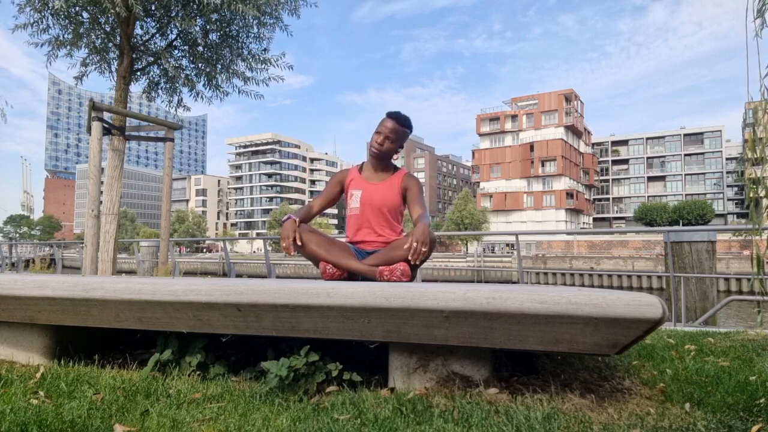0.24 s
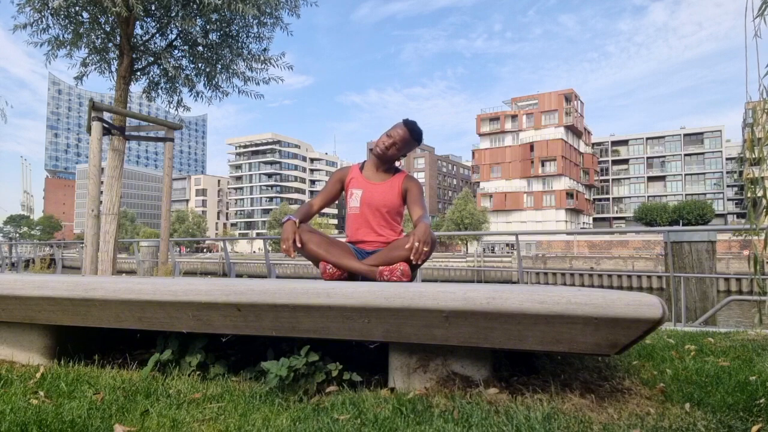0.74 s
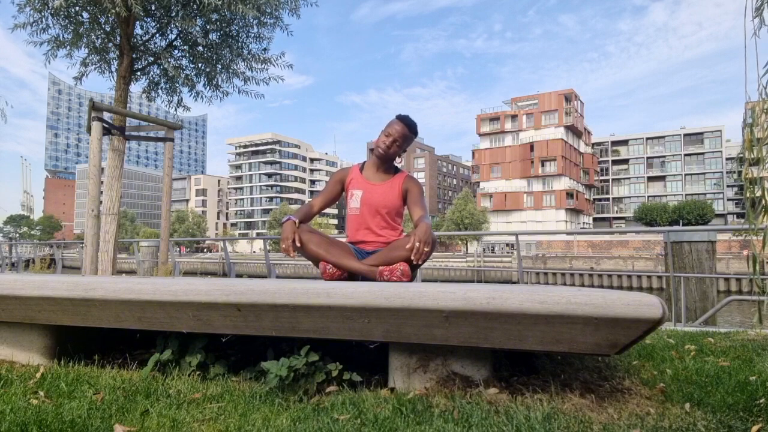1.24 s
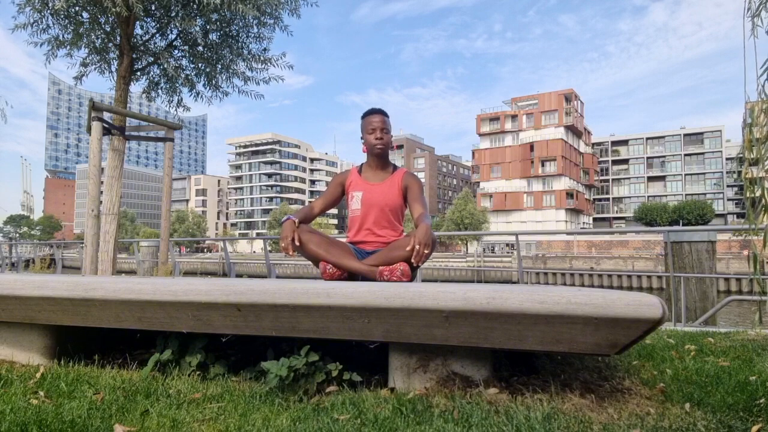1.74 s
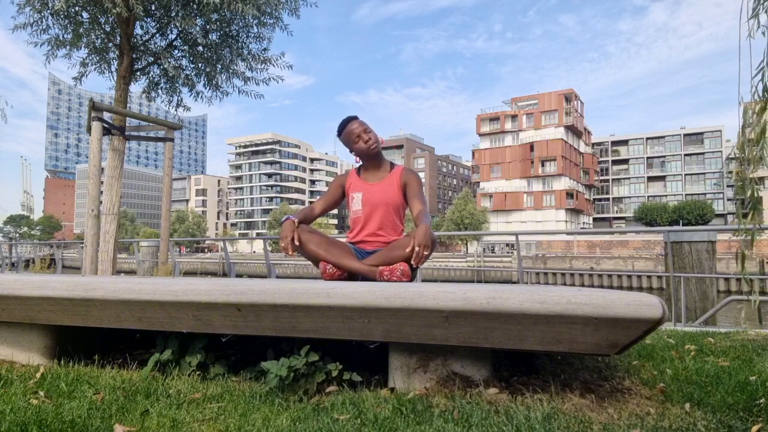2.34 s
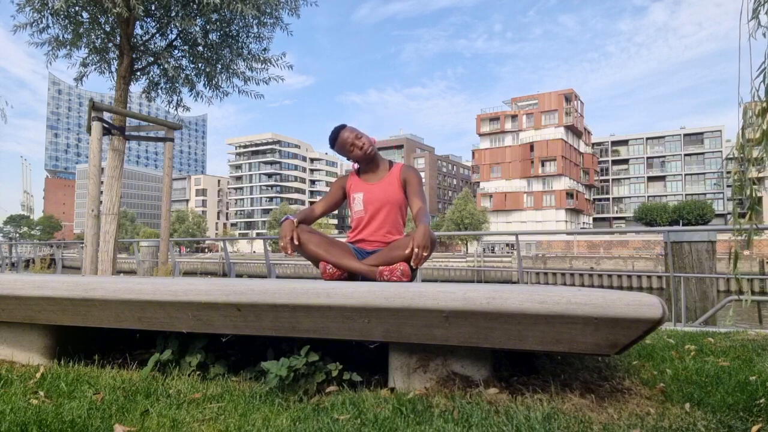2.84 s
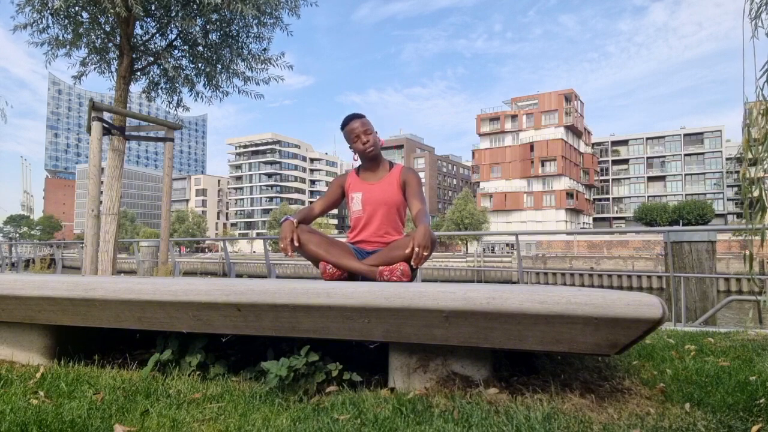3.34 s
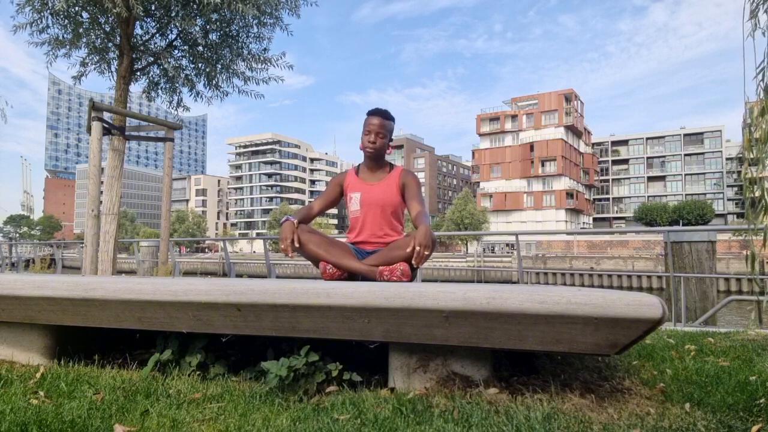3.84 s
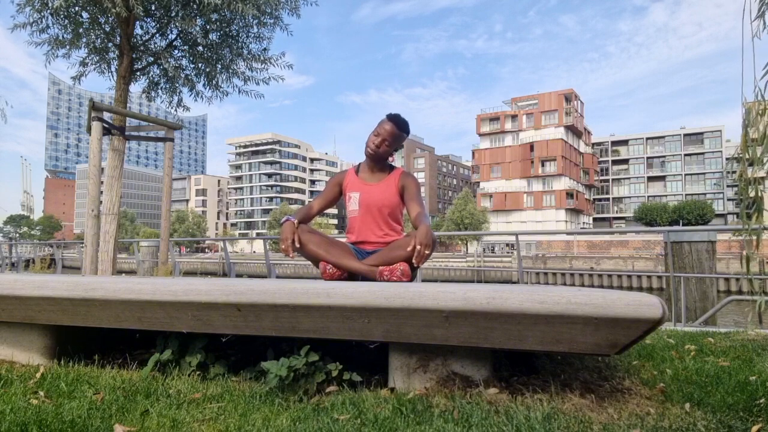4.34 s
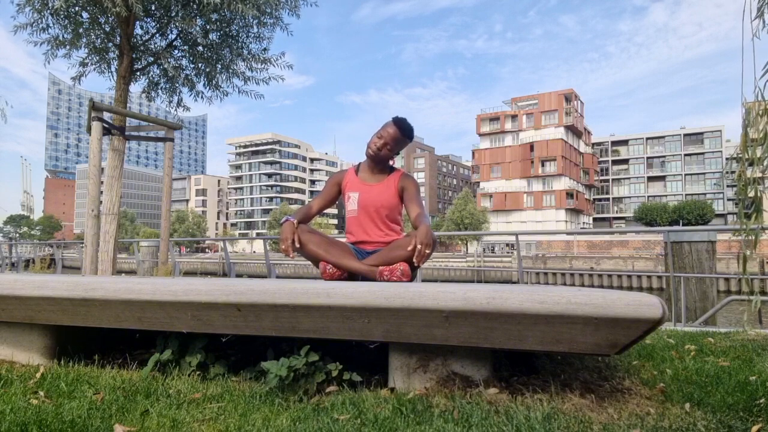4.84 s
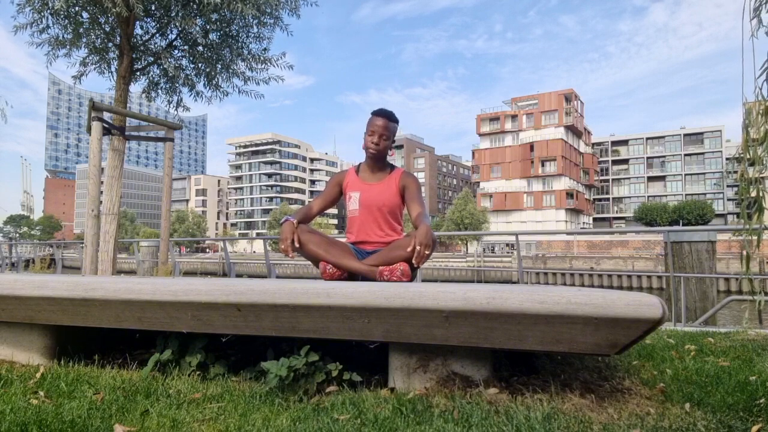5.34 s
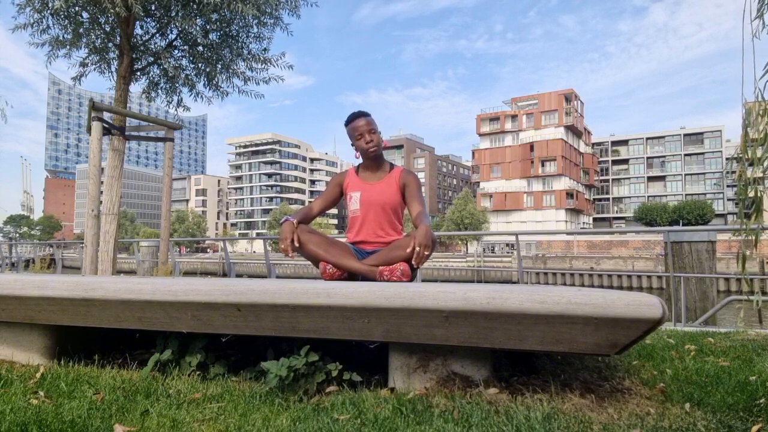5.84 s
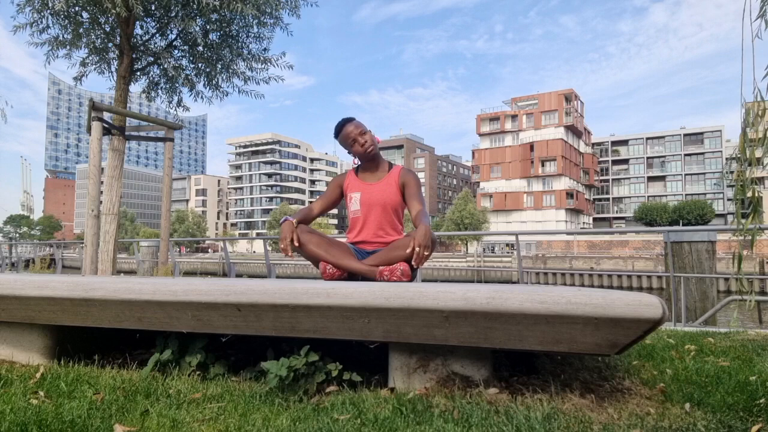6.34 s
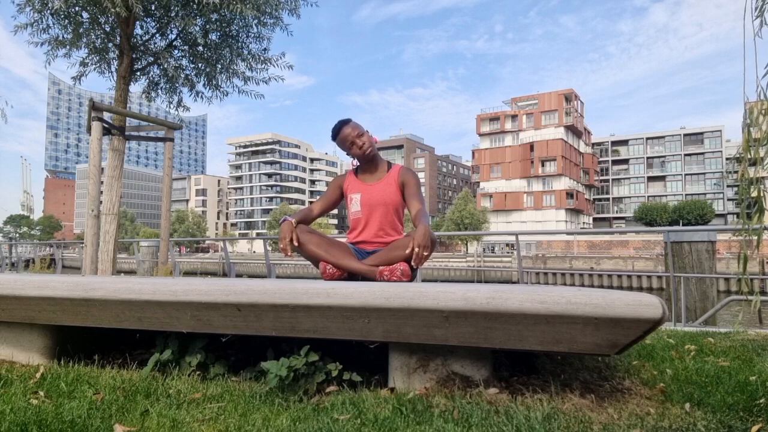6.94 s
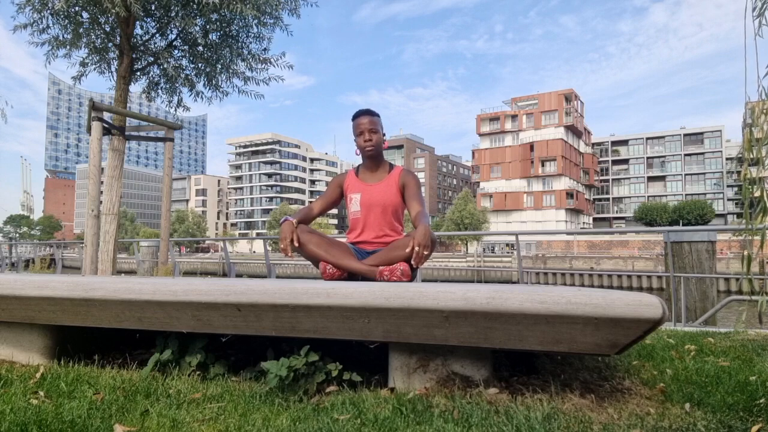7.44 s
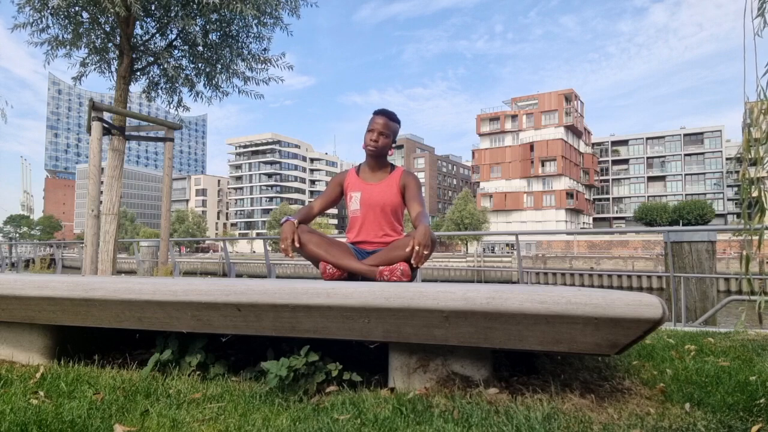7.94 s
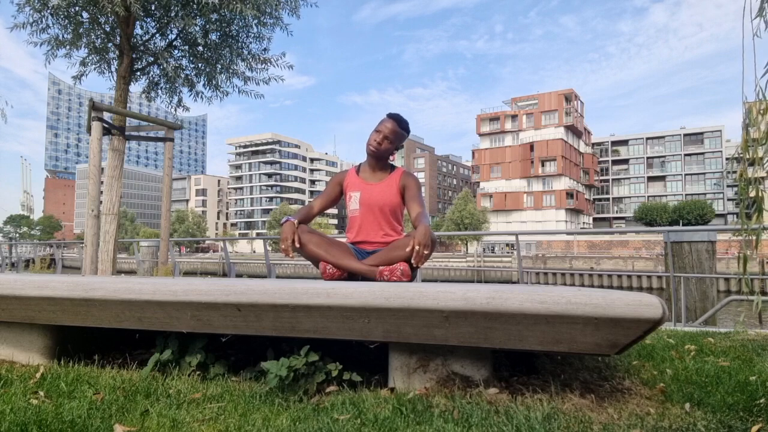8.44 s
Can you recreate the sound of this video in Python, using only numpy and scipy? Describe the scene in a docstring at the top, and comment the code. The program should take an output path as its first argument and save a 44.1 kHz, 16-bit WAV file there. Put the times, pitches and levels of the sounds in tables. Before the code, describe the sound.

Outdoors, a deep hollow traffic drone from all sides, quiet breeze hiss in the grass, tiny ticks, and a far motor droning up near the end.

```python
"""First the listener hears far traffic rumble from all sides of a quiet city quay lawn, around a hollow drone:
shaped noise with uneven narrow-band lumps near 96 Hz. Farther machines whine and hum faintly as blurred tones; one
squeals once, one drones up near the end, and soft knocks ring as decaying modes. Leaves and grass rustle, swish and
tick in a light breeze: patchy noise, short narrow-band swells and dry blows; brief random tonal blips make the hiss
grainy. The microphone is a phone with two ports, lying on the grass."""
import sys
import numpy as np
from scipy import signal
from scipy.fft import rfft, irfft, next_fast_len
from scipy.io import wavfile
from scipy.ndimage import uniform_filter1d

SR = 44100
rng = np.random.default_rng(int(sys.argv[2]) if len(sys.argv) > 2 else 0)


def to_wav(s):
    """Save 16-bit WAV."""
    ch = np.atleast_2d(s).T  # columns
    pcm = np.round(np.clip(ch, -1, 1) * 32767)  # PCM
    wavfile.write(sys.argv[1], SR, pcm.astype(np.int16))


N = 382347

# Far traffic rumble over time: time_s, level_db
TRAFFIC = [(0, -37.5), (1.3, -37.5), (2.2, -37.5), (3.9, -37.5), (5.4, -39.5), (6.2, -39.5), (7.2, -38.5),
           (7.8, -39.5), (8.67, -39)]
# Relative spectrum of the engine rumble: frequency_hz, density_db (per Hz)
RUMBLE = [(11, -42.5), (18, -25), (30, -15.5), (45, -8), (60, -10), (74, -5.5), (96, -10), (120, -7.5),
          (150, -12.5), (195, -14.5), (220, -20), (300, -26), (420, -33), (550, -48.5)]
# Relative spectrum of the tyre roar: frequency_hz, density_db (per Hz)
ROAR = [(150, -47), (260, -8), (439, -10.5), (538, -7), (773, -16.5), (927, -18.5), (1080, -24),
        (1250, -18.5), (1400, -20.5), (1600, -24), (2900, -37.5), (3770, -71)]
# Uneven narrow-band lumps of the low rumble near 96 Hz: time_s, centre_hz, level_db
RUMBLE_LUMPS = [(0.0, 100.5, -27.5), (0.07, 95.7, -47.5), (0.19, 99, -27.5), (0.24, 97.4, -55),
                (0.36, 92, -40.5), (0.55, 88.8, -46.5), (0.7, 99, -36.5), (1.06, 89.73, -41.5),
                (1.21, 97.5, -32.5), (1.69, 94.8, -42), (1.74, 96.4, -30.5), (2.2, 97.36, -39),
                (2.51, 102.0, -36.5), (2.61, 91.7, -35), (2.73, 90.3, -38.5), (2.85, 104.3, -36.5),
                (3.09, 104.3, -48), (3.19, 89.95, -37), (3.55, 97.8, -39.5), (3.81, 91.3, -39.5),
                (3.96, 97.8, -33.5), (4.2, 94.7, -43.5), (4.3, 85.2, -42), (4.39, 94.66, -52),
                (4.71, 96.3, -30.5), (4.85, 93.8, -38), (5.19, 97.1, -42), (5.41, 89.2, -37),
                (5.6, 89.66, -44), (5.96, 95.4, -40), (6.23, 93.3, -36), (6.67, 104.9, -39.5),
                (6.78, 88.9, -37), (6.86, 84.6, -43.5), (6.98, 95.7, -41), (7.27, 94.36, -39),
                (7.34, 89.1, -41), (7.58, 96.7, -42.5), (7.78, 87.33, -43), (7.9, 95.3, -37),
                (8.31, 89.34, -43.5), (8.4, 102.8, -48), (8.5, 105.1, -42), (8.67, 89.0, -35)]

# Whine of a far machine: time_s, pitch_hz, level_db
WHINE = [(0, 838, -64), (.35, 838, -67), (.6, 835, -72), (1.2, 838, -74), (1.45, 844, -71), (2.3, 835, -72),
         (2.63, 832, -64), (2.8, 832, -74), (3, 839, -66), (3.4, 845, -68), (3.7, 839, -71),
         (4.25, 840, -73), (4.8, 842, -63), (5, 843, -67), (5.26, 841, -63), (5.5, 845, -70),
         (5.85, 844, -70), (6.2, 838, -67), (6.6, 838, -74), (7, 839, -68), (7.55, 842, -73),
         (7.78, 839, -66), (8, 838, -77), (8.3, 835, -69), (8.67, 833, -68)]
# Hums that swell and fade: start_s, length_s, pitch_hz, level_db
HUMS = [(.8, 1.6, 73, -46), (3.6, 1.5, 72.5, -44), (1.7, 1.1, 128.5, -43), (4, 2.2, 141, -47),
        (7.7, 1.5, 142, -49), (.7, .75, 241, -52), (3.3, 1.1, 240, -54), (4.4, 3, 241, -57),
        (4.8, 3.2, 282, -58), (3.15, 1, 540, -58.5), (3.7, 1.9, 539, -67), (0, 1.2, 531, -69),
        (1.5, 1.6, 540, -67), (5.6, 1.3, 538, -68)]
# A motor that drones up: time_s, pitch_hz, level_db, octave_level_db
DRONE = [(7.2, 246, -60, -72), (7.42, 252, -52, -62), (7.55, 255, -46, -61), (7.66, 255.3, -43.5, -56),
         (7.76, 255, -45, -57), (7.82, 254, -53, -59), (7.95, 255, -54, -64), (8.05, 257, -52, -59),
         (8.19, 258, -49, -62), (8.3, 258, -51, -60), (8.42, 257, -54, -62), (8.58, 256.5, -48, -61),
         (8.67, 255, -50, -63)]
# Lines of the drone: multiple, relative_level_db
DRONE_ORDERS = [(1, 0), (1.5, -21)]
# Lines of the squeal: multiple, relative_level_db
SQUEAL_ORDERS = [(1, -2), (2, -1), (5, 1), (6, 1)]
# A single line without overtones: multiple, relative_level_db
PURE = [(1, 0)]
# Soft far knocks: start_s, level_db, pitch_hz, ring_t60_s
KNOCKS = [(3.72, -61, 1300, .35), (4.42, -58, 732, .12), (4.585, -43, 710, .06), (5.2, -60, 740, .2),
          (7.52, -63, 756, .26), (7.83, -70, 1190, .25)]

# Breeze in leaves and grass: time_s, level_db, left_minus_right_db, brightness_db (per octave)
BREEZE = [(0, -70.5, 2, -3), (.7, -74, 1, -4.5), (1.5, -70, 1.5, -2), (2.7, -72, 1, -3), (3.1, -70, 0, -3),
          (4.1, -71.5, 1, -2.5), (5, -70.5, 0, -2), (5.9, -70.5, -1, -4.5), (6.3, -69, -1, -2),
          (6.55, -73, -1, -4.5), (7, -70, -1.5, -1.5), (7.5, -71.5, -1.5, -4), (8.3, -71, -1.5, 1.5),
          (8.45, -69.5, -0.5, -0.5), (8.67, -68, -1.5, 0.5)]
# Puffs that stir the leaves: peak_s, over_breeze_db, length_s
PUFFS = [(0.969, 6, .08), (1.79, 1.5, .22), (1.965, 2, .1), (2.935, 2.5, 0.16), (4.024, 3.5, .06),
         (5.395, 3.5, .12), (5.61, 3.5, 0.061), (6.085, 3, .14), (6.239, 3, 0.13), (6.674, 4, .05),
         (6.734, 7, .2), (7.177, 5, 0.28), (7.933, 4.5, .66), (8.455, 2.5, .2), (8.597, 2.5, 0.14),
         (2.078, 4.5, 0.053)]
# Relative spectrum of the rustle: frequency_hz, density_db (per Hz)
RUSTLE = [(1120, -20.5), (1900, -9.5), (2830, -7), (3220, -2), (4040, -5.5), (4650, -5), (5520, -5),
          (6240, -8.5), (7320, -9.5), (8230, -24), (10700, -51.5), (18100, -120)]
# Range and levels of the tonal blips that make the hiss grainy: frequency_hz, relative_level_db
GRAIN = [(900, -1), (1300, 2), (2000, -4), (2800, -9), (3500, -6), (5500, -8), (7300, -13), (8000, -24)]
# Narrow swells in the hiss: start_s, length_s, pitch_hz, level_db
SWISHES = [(0.721, .04, 1630, -70), (1.826, 0.045, 4150, -74), (7.9, .06, 4900, -79),
           (1.729, 0.064, 4270, -78), (5.6, 0.043, 5490, -76), (5.9, .2, 5400, -83),
           (1.75, .11, 1602, -72.5), (1.775, .04, 1950, -78), (1.78, .08, 2380, -75),
           (2.225, .05, 4130, -78.5), (2.877, 0.096, 4227, -79), (3.002, 0.039, 3850, -78),
           (3.34, 0.048, 1267, -69), (3.5, .22, 2212, -79), (4.04, 0.13, 1289, -71.5),
           (5.6, .13, 3910, -84), (5.862, 0.044, 1365, -71), (6.02, 0.063, 3900, -74),
           (6.655, .04, 1843, -69), (6.655, .04, 3300, -77), (7.741, .2, 4020, -83), (8, .1, 5800, -75),
           (8.389, 0.15, 5940, -77), (8.57, 0.1, 5597, -80), (8.6, 0.038, 3840, -76)]
# Dry ticks in the grass: start_s, level_db, pitch_hz, left_minus_right_db
TICKS = [(0.423, -65, 3920, 5), (1.707, -73, 3373, -1), (1.734, -63, 4940, -8), (1.831, -69, 4210, -2),
         (4.4925, -56, 5450, 5), (5.6068, -64.5, 5500, 2), (7.1713, -67, 3640, 1), (1.752, -70, 4250, -2),
         (2.003, -81, 8700, 5), (7.2, -68, 5500, -0.5), (7.255, -64, 5470, 0), (8.56, -75, 9100, -5)]
# Relative spectrum of the topmost hiss: frequency_hz, density_db (per Hz)
AIR = [(7000, -30), (8200, 3), (9200, -1), (10700, -3), (12600, 0), (15000, -1), (16500, -1)]
# Bright swells of the topmost hiss: peak_s, over_hiss_db, length_s
GLINTS = [(1.805, 6.5, .12), (2.92, 1.5, .14), (5.95, 2, .1), (6.75, 1, .2), (7.24, 5.5, .24),
          (7.92, 5, 0.084)]

# Sensitivity of the microphone ports: frequency_hz, left_minus_right_db
PORTS = [(40, 0.4), (120, -1), (300, -2), (900, -2), (1540, -3.5), (2640, -1), (4530, -2.5), (7500, -8.5),
         (9000, 0)]

ROAR_DB, LUMP_DRIFT_HZ = -57, 1.5
WHINE_DRIFT_HZ = 2.2
DRONE_STARTS_S = 7.2
DRONE_THIRD_DB, DRONE_THIRD_S = -26, .95  # the third multiple sounds only while the motor runs up
SQUEAL_S, SQUEAL_LONG_S, SQUEAL_HZ, SQUEAL_DB = 2.3, .36, 941, -83
SQUEAL_SAG_HZ, SQUEAL_SAG_S, SQUEAL_FADE_DB = 18, .14, -2  # pitch and level drop over the last moments
SQUEAL_DIP_S, SQUEAL_DIP_LONG_S, SQUEAL_DIP_DB = 2.48, .11, -9  # it falters once
AIR_DB = -95
AIR_ALIKE = .35  # share of the other port's topmost hiss added to each port
ACROSS_S = 0.000514  # sound travels from port to port
TOP_HZ = 15740  # the phone cuts what lies above
EDGE = 8192  # spare samples that keep both ends free of clicks
SIZE = next_fast_len(N + 2 * EDGE)
HZ = np.fft.rfftfreq(SIZE, 1 / SR)
T = np.arange(N) / SR


def undb(db):
    """Turn decibels into an amplitude factor."""
    return 10 ** (np.asarray(db) / 20)


def curves(table):
    """Columns of a table, joined by straight lines to one value per sample."""
    s, *columns = np.transpose(table)
    return [np.interp(T, s, c) for c in columns]


def walk(rate):
    """Random levels held 1 / rate s and smoothed twice; spread near 1."""
    k = int(SR / rate)
    steps = np.repeat(rng.standard_normal(N // k + 1), k)
    return 1.307 * uniform_filter1d(uniform_filter1d(steps, k), k)[:N]


def swell(start, long_s, edge):
    """Rise, hold and fall between 0 and 1; each edge takes that share of the length."""
    x = (T - start) / long_s
    return np.sin(np.pi / 2 * np.clip(np.minimum(x, 1 - x) / edge, 0, 1)) ** 2


def pan(x, pan_db, lag_s=0.):
    """Share a sound between the ports; the left one hears it lag_s later."""
    late = np.interp(T - lag_s, T, x)
    return np.array([late * undb(pan_db / 2), x * undb(-pan_db / 2)])


def wash(colour, direct, patchy_db, size, wide, long, tilt_db=np.zeros(N)):
    """Stereo noise of rms 1 from many small sources: its level wanders in patches of time and pitch.

    A direct share arrives from the right, the rest from all sides.
    Patches are wide bins by long frames; a frame has size samples."""
    hz, db = np.transpose(colour)
    gain = undb(np.interp(np.log(HZ + 1), np.log(hz), db, left=-200, right=-200))
    left, other = rfft(rng.standard_normal((2, SIZE))) * gain

    # sound from all sides is alike at both ports only where the wave is longer than their gap
    direct = np.clip(direct, 0, 1)
    diffuse_alike = np.sinc(2 * HZ * ACROSS_S)
    direct_alike = np.exp(2j * np.pi * HZ * ACROSS_S)
    alike = (1 - direct) * diffuse_alike + direct * direct_alike
    right = alike * left + np.sqrt(1 - np.abs(alike) ** 2) * other
    ports = irfft([left, right], SIZE)

    f, t, cells = signal.stft(ports, SR, nperseg=size, noverlap=size * 3 // 4)
    patches = rng.standard_normal(cells.shape[1:])
    for _ in range(2):
        patches = uniform_filter1d(uniform_filter1d(patches, wide, axis=0), long, axis=1)
    octaves = np.log2((f[:, None] + 1) / np.sqrt(hz[1] * hz[-2]))
    brightness_db = np.interp(t, T, tilt_db) * np.clip(octaves, -2, 2)
    cells = cells * undb(patchy_db * patches / patches.std() + brightness_db)
    out = signal.istft(cells, SR, nperseg=size, noverlap=size * 3 // 4)[1][:, :N]
    return out / np.sqrt(np.mean(out ** 2))


def tone(hz, db, orders, rough, blur_hz):
    """A tone and its multiples; scattered copies with wandering phase blur each line."""
    phase = 2 * np.pi * np.cumsum(hz * np.ones(N)) / SR
    rough = np.clip(rough, 0, 1)
    lines = np.zeros(N)
    for k, order_db in orders:
        steady = np.sqrt(2 - 2 * rough) * np.sin(k * phase)
        scattered = walk(blur_hz) * np.sin(k * phase) + walk(blur_hz) * np.cos(k * phase)
        lines += undb(order_db) * (steady + np.sqrt(rough) * scattered)
    return undb(db) * lines


def ring(s, db, hz, t60, rough):
    """One blow: a short rise, then a mode, roughened by noise, dies away."""
    t = np.clip(T - s, 0, None)
    shape = (1 - np.exp(-t / .0015)) * np.exp(-np.log(1000) * t / t60)
    return undb(db) * shape * np.sin(2 * np.pi * hz * t) * (1 + rough * walk(hz / 4))


def rumble_lumps():
    """Uneven narrow-band lumps of the low rumble: one blurred line whose centre and level wander."""
    hz, db = curves(RUMBLE_LUMPS)
    return tone(hz + LUMP_DRIFT_HZ * walk(3.), db, PURE, rough=.4, blur_hz=32.)


def traffic():
    """Far off on all sides, engines rumble unevenly below and tyres roar above."""
    rumble = undb(*curves(TRAFFIC)) * wash(RUMBLE, direct=.03, patchy_db=.4, size=4096, wide=1, long=8)
    roar = wash(ROAR, direct=.1, patchy_db=2.2, size=2048, wide=2, long=4)
    return rumble + roar * undb(ROAR_DB) + pan(rumble_lumps(), 0.)


def far_whine():
    """A single blurred line whose pitch drifts and whose level wavers."""
    hz, db = curves(WHINE)
    return tone(hz + WHINE_DRIFT_HZ * walk(4.), db, PURE, rough=.45, blur_hz=24.)


def far_hums():
    """Single blurred lines that each swell and fade."""
    return sum(swell(s, long_s, edge=.4) * tone(hz, db, PURE, rough=.3, blur_hz=22.)
               for s, long_s, hz, db in HUMS)


def motor_drone():
    """A motor's lines on a shared pitch; the octave has its own level, the third multiple fades early."""
    hz, db, octave_db = curves(DRONE)
    lines = tone(hz, db, DRONE_ORDERS, rough=.2, blur_hz=30.)
    octave = tone(hz, octave_db, [(2, 0)], rough=.3, blur_hz=25.)
    third = tone(hz, db, [(3, DRONE_THIRD_DB)], rough=.4, blur_hz=16.)
    running = swell(DRONE_STARTS_S, 3, edge=.03)
    run_up = swell(DRONE_STARTS_S, DRONE_THIRD_S, edge=0.15)
    return running * (lines + octave) + run_up * third


def squeal():
    """A rough tone with strong multiples that falters once and sags in pitch and level as it ends."""
    sag = np.clip((T - SQUEAL_S - SQUEAL_LONG_S) / SQUEAL_SAG_S + 1, 0, 1) ** 2
    dip_db = SQUEAL_DIP_DB * swell(SQUEAL_DIP_S, SQUEAL_DIP_LONG_S, edge=.4)
    db = SQUEAL_DB + SQUEAL_FADE_DB * np.sqrt(sag) + dip_db
    hz = SQUEAL_HZ - SQUEAL_SAG_HZ * sag
    return swell(SQUEAL_S, SQUEAL_LONG_S, edge=0.14) * tone(hz, db, SQUEAL_ORDERS, rough=.4, blur_hz=80.)


def far_knocks():
    """Soft blows, each ringing in one mode."""
    return sum(ring(s, db, hz, t60, rough=.4) for s, db, hz, t60 in KNOCKS)


def machines():
    """The whine reaches the right port first, the squeal leans left, the others sit in the middle."""
    middle = far_hums() + motor_drone() + far_knocks()
    return pan(far_whine(), -2., ACROSS_S / 2) + pan(middle, 0.) + pan(squeal(), 4.)


def wind_on_ports():
    """The wind barely stirs the ports: slow noise, separate in each, without the lowest pressure swings."""
    wind = undb(-56) * np.array([walk(200.), walk(200.)])
    return signal.sosfilt(signal.butter(2, 22, "high", fs=SR, output="sos"), wind)


def topmost_hiss(follow_db):
    """The thinnest hiss on top follows the puffs a little and reaches both ports partly alike."""
    top = wash(AIR, direct=0, patchy_db=2.5, size=512, wide=30, long=14)
    top = top + AIR_ALIKE * top[::-1]
    glints_db = sum(over_db * swell(s - long_s / 2, long_s, edge=.4) for s, over_db, long_s in GLINTS)
    return undb(AIR_DB + glints_db + .15 * follow_db) * top


def hiss_grains(level_db, count, spread_db, long_s):
    """Brief random tonal blips that make the hiss grainy, each with its own lag between the ports."""
    at, pitch, size, side, length = rng.random((count, 5)).T
    table_hz, table_db = np.transpose(GRAIN)
    hz = table_hz[0] + (table_hz[-1] - table_hz[0]) * pitch ** 1.4
    db = np.interp(hz, table_hz, table_db)
    start, t = (at * N).astype(int), np.arange(3500) / SR
    gain = undb(db + level_db[start] - spread_db * np.log(.08 + size))
    shape = np.sin(np.pi * np.clip(t / (long_s * (0.47 + length[:, None])), 0, 1)) ** 2
    out = np.zeros((2, N + len(t)))
    # the left port lags, or leads where the lag is negative
    for port, lag_s in enumerate((ACROSS_S * (0.95 * side - .4), 0 * side)):
        blips = gain[:, None] * shape * np.sin(2 * np.pi * hz[:, None] * (t - lag_s[:, None]))
        for i, blip in zip(start, blips):
            out[port, i:i + len(t)] += blip
    return out[:, :N]


def grass_swishes():
    """Narrow-band swells: tones so blurred that little steady pitch remains."""
    return sum(swell(s, long_s, edge=0.18) * tone(hz, db, PURE, rough=.9, blur_hz=hz / 12)
               for s, long_s, hz, db in SWISHES)


def grass_ticks():
    """Single blades tick: rough blows that die away within a few hundredths of a second."""
    return sum(pan(ring(s, db, hz, t60=.035, rough=.45), pan_db) for s, db, hz, pan_db in TICKS)


def grainy_hiss(db, puffs_db, pan_db, tilt_db):
    """Leaves hiss as patchy noise, with tonal grain mixed in; puffs lift all bands together."""
    leaves = wash(RUSTLE, direct=.3, patchy_db=3., size=1024, wide=2, long=6, tilt_db=tilt_db)
    # the grain stands out less from the hiss when the breeze is stronger
    grain_db = -8.5 - .3 * (db - db.mean())
    grainy = leaves + hiss_grains(grain_db, count=2000, spread_db=3.2, long_s=.055)
    return grainy * undb(puffs_db + np.array([pan_db, -pan_db]) / 2)


def breeze():
    """A light breeze with puffs drives the leaf hiss and, a little, the topmost hiss; grass stirs close by."""
    db, pan_db, tilt_db = curves(BREEZE)
    db = db + sum(over_db * swell(s - long_s / 2, long_s, edge=0.43) for s, over_db, long_s in PUFFS)
    puffs_db = db + .6 * walk(25.)  # small quick unsteadiness
    hiss = grainy_hiss(db, puffs_db, pan_db, tilt_db)
    air = topmost_hiss(puffs_db - db.mean())
    return wind_on_ports() + air + pan(grass_swishes(), 1.) + grass_ticks() + hiss


def scene():
    """Far traffic, faint machines and the breeze on the lawn, as they reach the two ports."""
    return traffic() + machines() + breeze()


def record(dry):
    """The right port is more sensitive over most of the range, above all near 7.5 kHz; a steep filter cuts the top."""
    hz, db = np.transpose(PORTS)
    lean_db = np.interp(np.log(HZ + 1), np.log(hz), db) / 2
    longer = np.pad(dry, [(0, 0), (EDGE, SIZE - N - EDGE)], "reflect", reflect_type="odd")
    heard = irfft(rfft(longer) * undb([lean_db, -lean_db]), SIZE)
    top_cut = signal.ellip(14, .2, 70, TOP_HZ, fs=SR, output="sos")
    return signal.sosfilt(top_cut, heard)[:, EDGE:EDGE + N]


dry = scene()
out = record(dry)
to_wav(out)
```